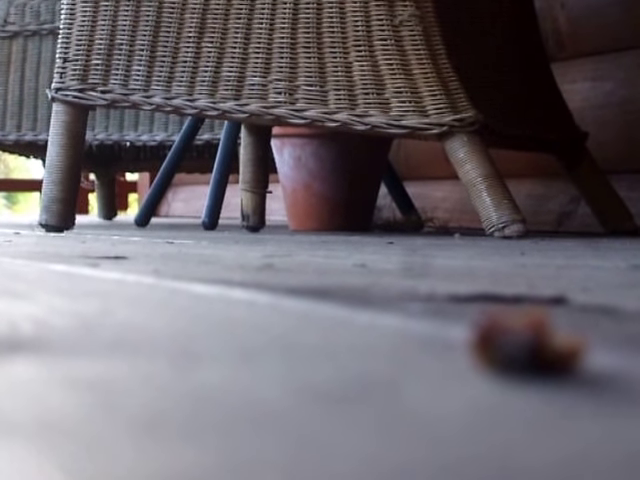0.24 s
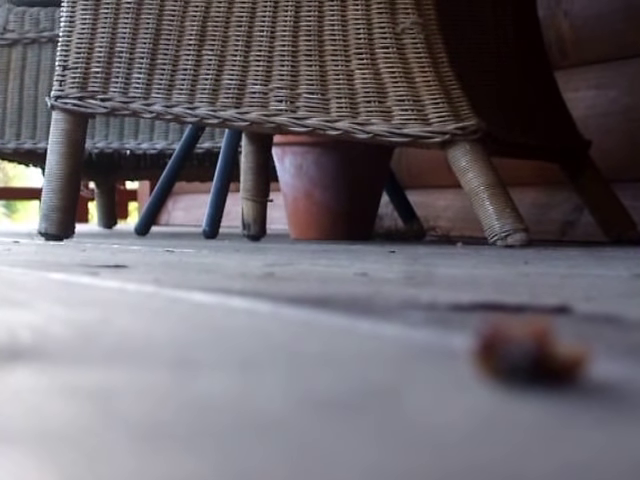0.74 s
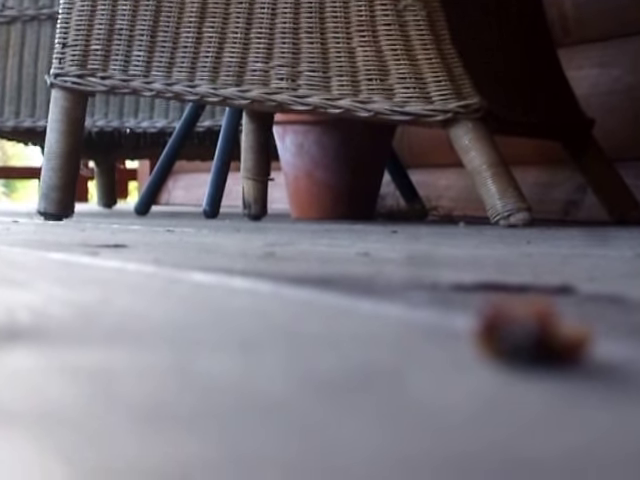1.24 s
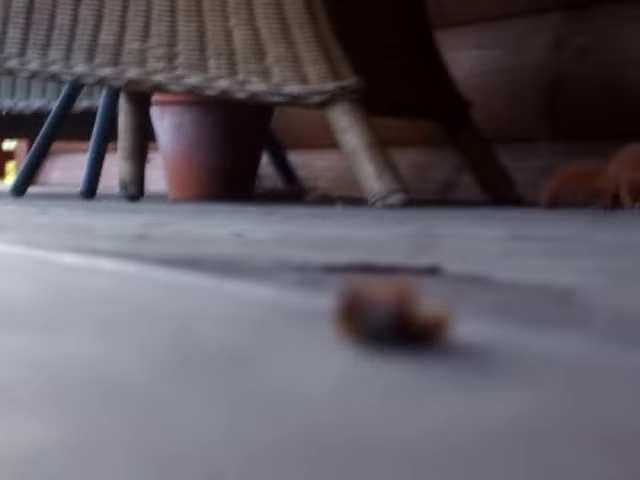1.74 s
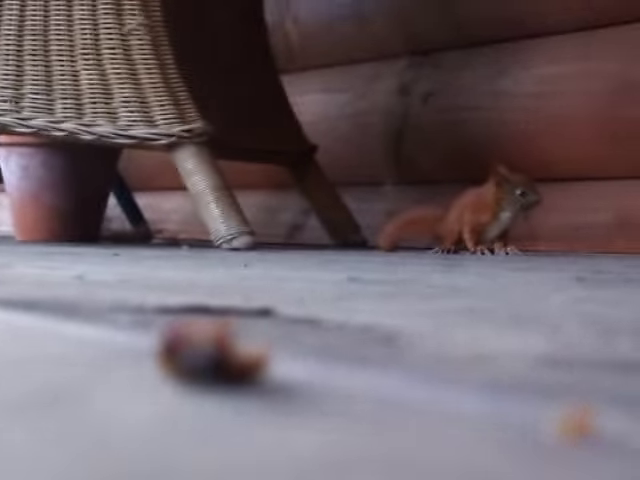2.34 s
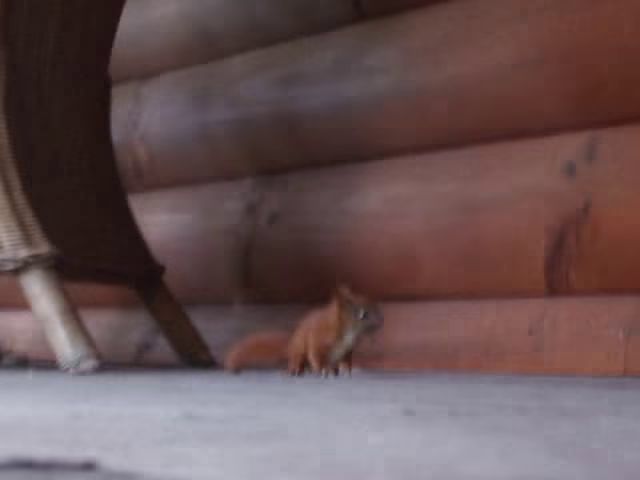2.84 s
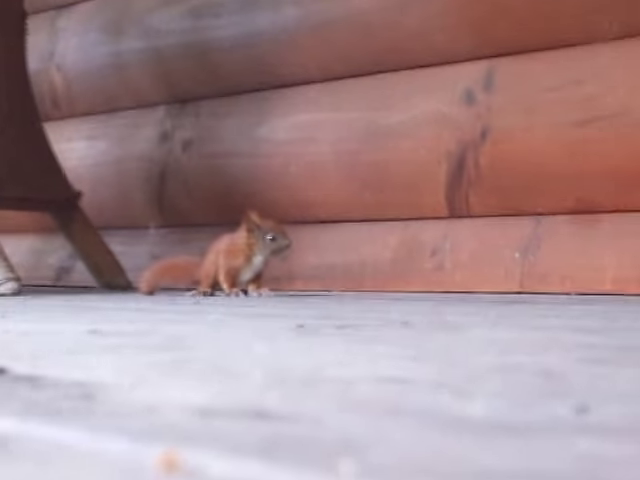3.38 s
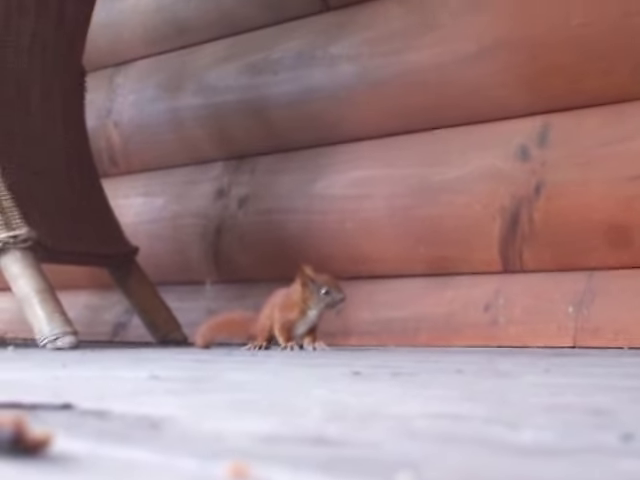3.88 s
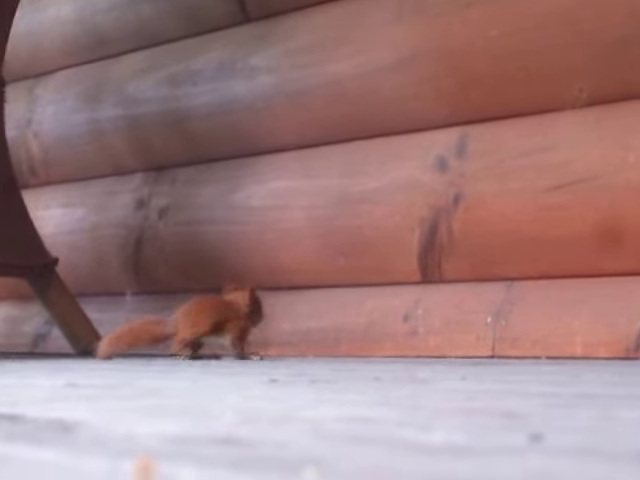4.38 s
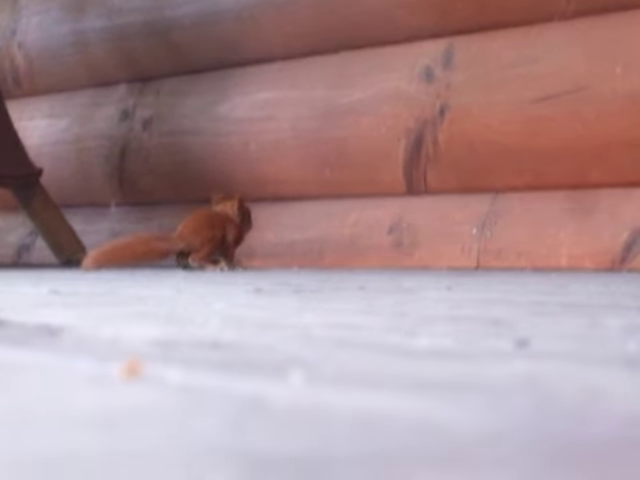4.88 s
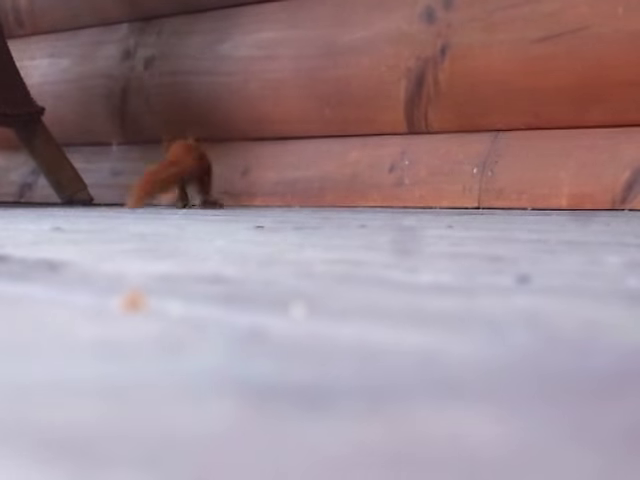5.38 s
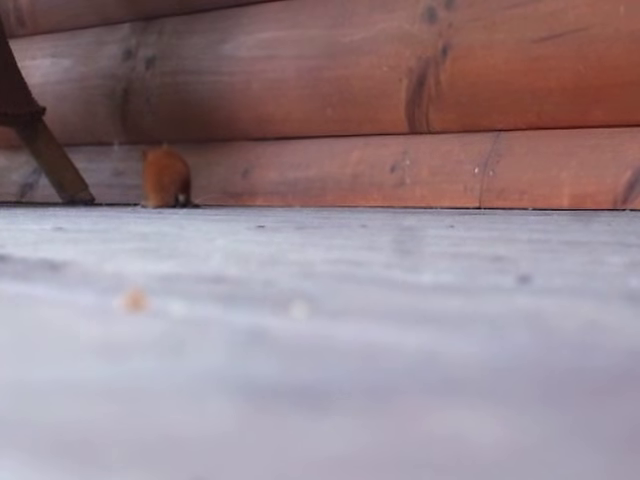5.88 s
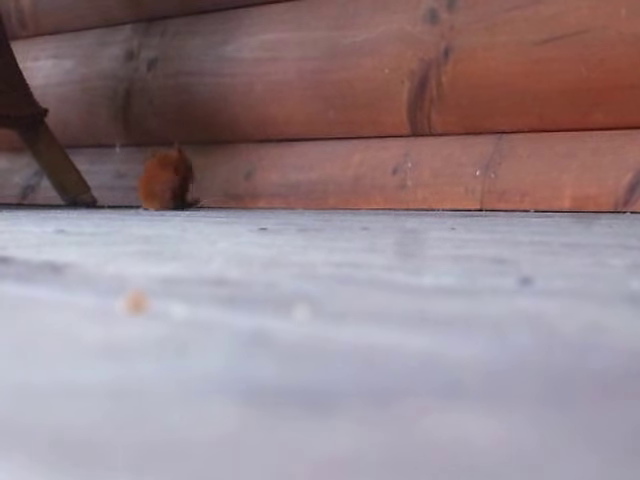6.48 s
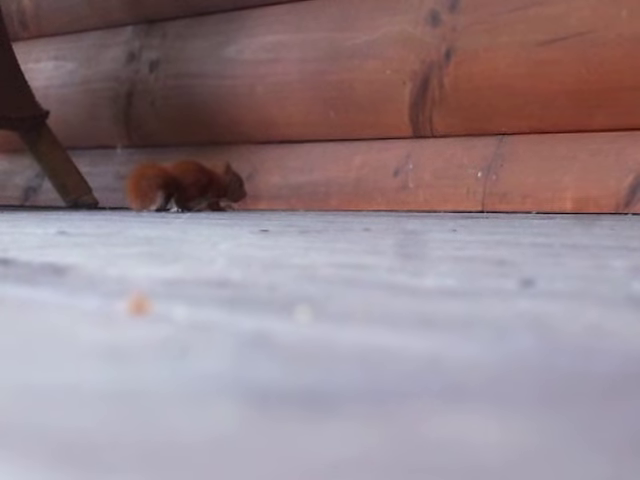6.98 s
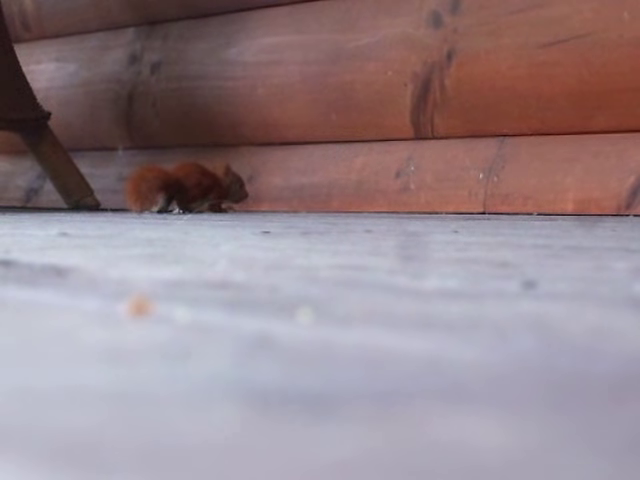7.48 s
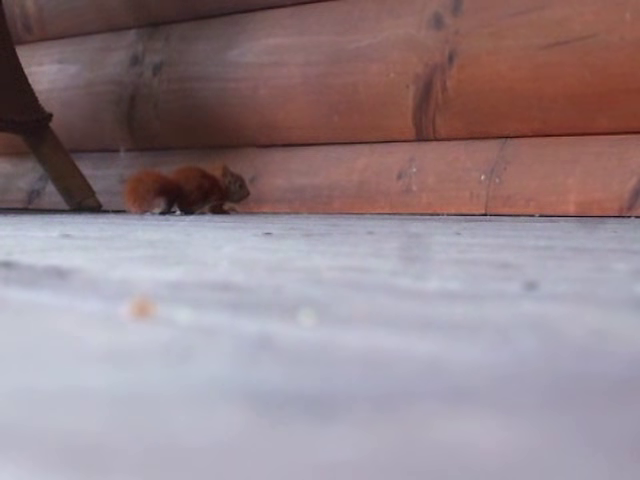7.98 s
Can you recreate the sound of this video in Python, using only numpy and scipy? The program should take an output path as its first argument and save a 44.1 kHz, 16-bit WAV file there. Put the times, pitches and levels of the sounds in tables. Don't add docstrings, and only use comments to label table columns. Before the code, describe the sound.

A small camera grates in jerks over gritty porch boards, gets knocked hard twice, then squirrel claws scratch and paws patter amid steady hiss.

```python
import sys
import numpy as np
from scipy import signal
from scipy.io import wavfile
from scipy.ndimage import uniform_filter1d

SR = 44100
rng = np.random.default_rng(int(sys.argv[2]) if len(sys.argv) > 2 else 0)


def boost_factor(decibels):
    exponent = np.asarray(decibels, float) / 20
    return 10 ** exponent


def transcribe(u):
    v = np.clip(np.atleast_2d(u).T, -1, 1)
    q = np.round(v * 32767).astype(np.int16)
    wavfile.write(sys.argv[1], SR, q)


N = 362943

# [start t/s, length/s, pressure level/dB, grit over it/dB, low ring f/Hz]
DRAG_JERKS = [(0.324, 0.27, -47, -5.5, 1074), (0.57, 0.053, -34, -2, 690), (0.588, 0.049, -37, 6.5, 690),
              (0.646, 0.072, -35, -5.5, 600), (0.696, 0.05, -38, -9.5, 680), (0.8, 0.034, -44, -8, 730),
              (0.811, 0.065, -36.5, -5, 690), (0.877, 0.077, -37, -7.5, 700), (0.925, 0.092, -40, -10, 690),
              (0.984, 0.14, -41, -10, 690), (1.091, 0.088, -41.5, -7, 724), (1.14, 0.045, -38, -2, 800),
              (1.159, 0.07, -32, -2, 780), (1.19, 0.054, -27.5, -6.5, 663), (1.216, 0.06, -36.5, -0.5, 696),
              (1.255, 0.059, -37, -3.5, 730), (1.286, 0.058, -36, 1, 800), (1.303, 0.09, -29.5, -5, 780),
              (1.366, 0.074, -33, -4, 686), (1.415, 0.093, -31, -4, 750), (1.475, 0.078, -33.5, -1.5, 980),
              (1.529, 0.044, -34, 3, 920)]
# [f/Hz, width/Hz, level/dB]
CASE_MODES = [(497, 142, 0), (694, 550, -7.5), (1120, 83, -1)]
# [f/Hz, width/Hz, level/dB]
DEEP_BOARD_MODES = [(60, 100, -16.5), (131, 21, -9), (197, 87, -5.5), (287, 32, -3)]
# [f/Hz, width/Hz, level/dB]
GRIT_MODES = [(1650, 1360, -9), (2430, 320, 3), (3450, 720, 0)]
# [f/Hz, width/Hz, level/dB]
DUST_MODES = [(4560, 390, 1.5), (5830, 640, -2.5), (6110, 410, 2.5), (7600, 570, -3.5)]
# [t/s, strength level/dB, contact/ms]
CASE_BLOWS = [(0.659, -31.5, 1.8), (1.548, -26.5, 3), (3.4336, -7, 0.49), (3.4348, -18, 0.065),
              (3.4375, -10, 0.38), (3.4389, -8, 0.92), (3.4424, -17, 0.87), (3.451, -33.5, 0.55),
              (3.7344, -16.5, 1.63), (3.738, -15, 2.4), (3.7416, -25.5, 1.36), (3.7462, -36, 0.81),
              (3.754, -42, 0.84)]
# [f/Hz, level/dB, t60/s]
KNOCK_MODES = [(133, -20.5, 0.38), (150, -25.5, 0.26), (522, -40, 0.2), (185, -22.5, 0.07), (262, -39, .12),
               (403, -31.5, 0.36), (476, -6.5, 0.032), (780, 2, 0.01), (695, -33, 0.15), (983, -24.5, 0.11),
               (1390, -13, 0.0036), (1760, -17, 0.0078), (2200, -27, 0.0083), (2580, -6.5, .012),
               (2940, -7.5, 0.0097), (3530, -3, 0.0072), (4850, -5.5, 0.0055), (5500, -11.5, 0.0057),
               (6100, -0.5, 0.0041)]
# [t/s, peak level/dB, loudest ring f/Hz, upper ring over it/dB]
CLAW_JABS = [
    (4.1786, -20.5, 2320, -11),
    (4.1808, -24.5, 2540, -12),
    (4.184, -25, 2380, -12),
    (4.1902, -31, 2330, -14),
]
# [t/s, peak level/dB, loudest ring f/Hz, upper ring over it/dB]
CLAW_SCRAPES = [(4.3693, -38, 2300, -22), (4.377, -39, 2200, -20), (4.567, -34.5, 2250, -20),
                (4.5844, -39, 2170, -12), (7.8385, -24.5, 2680, -10), (7.8428, -29, 2250, -9),
                (8.0245, -35, 2300, -16), (8.1745, -34, 2200, -20), (8.1795, -35, 2200, -20),
                (8.186, -34, 2300, -14), (8.1915, -34, 2700, -6)]
# [t/s, peak level/dB, loudest ring f/Hz, upper
# ring over it/dB]
CLAW_SLIPS_HIGH_BOARD = [(4.7488, -22, 2290, -21), (4.7445, -39, 2250, -20), (4.7585, -30.5, 2950, -16),
                         (4.7624, -25, 2270, -17), (4.772, -35, 2190, -18), (4.7864, -45, 2260, -10),
                         (5.8184, -30, 2960, -1), (5.8228, -22.5, 2950, -6.5), (5.831, -29.5, 2250, -4),
                         (5.844, -37, 2250, -9), (5.8594, -41, 3000, -14), (5.8764, -43, 2980, -20),
                         (5.851, -40, 3000, -8), (5.9844, -39, 2210, -2), (6.1838, -36.5, 2430, -1),
                         (6.1994, -42, 2880, -10), (7.8296, -27, 2820, -8), (7.8335, -27, 2200, -5),
                         (8.0154, -31, 2300, -16), (8.0205, -29, 2260, -17), (8.1965, -29.5, 2250, -12),
                         (8.031, -36, 2200, -18), (5.838, -37, 2250, -6)]
# [f/Hz, level/dB, t60/s]
PLANK_MODES = [(2170, -26, 0.012), (2250, -3, 0.023), (2520, -8, 0.017), (2700, -4, 0.015),
               (2950, -2.5, 0.013), (3210, -5, 0.012)]
# [f/Hz, level/dB, t60/s]
SPLINTER_MODES = [(3500, 2, .012), (4240, -15, 0.016)]
# [t/s, peak level/dB,
# board f/Hz, t60/s, overtone level/dB]
BOARD_THUMPS = [(3.745, -28, 256, 0.035, -11), (4.083, -39.5, 262, 0.044, -14),
                (4.182, -34.5, 950, 0.053, -6), (4.185, -33.5, 330, 0.047, -14),
                (4.221, -38.5, 594, 0.05, -16), (4.307, -29, 605, 0.024, -12), (4.567, -43, 790, 0.081, -13),
                (4.749, -38, 990, 0.05, -14), (4.764, -34, 964, 0.052, -14), (7.843, -33, 505, 0.04, -12),
                (6.181, -49, 560, 0.032, -18), (7.689, -45.5, 296, 0.11, -14), (7.84, -31, 304, 0.086, -5),
                (8.026, -37.5, 317, 0.075, 0), (8.199, -30, 330, 0.048, -12)]
# [start t/s, length/s, level/dB, ring f/Hz at start, ring f/Hz at end]
PAW_SHUFFLES = [
    (4.2, 0.078, -52, 720, 710),
    (4.36, 0.11, -52, 880, 810),
    (4.495, 0.072, -46, 720, 700),
    (4.56, 0.065, -42.5, 850, 810),
    (5.585, 0.08, -48.5, 656, 590),
    (6.355, 0.058, -50.5, 410, 385),
    (6.762, 0.035, -44.5, 1000, 1060),
    (7.04, 0.065, -54, 800, 780),
    (7.595, 0.087, -49.5, 1200, 1650),
    (7.62, 0.063, -45, 850, 1550),
]
# [t/s, peak level/dB, ring f/Hz, treble over it/dB]
DRY_TICKS = [(0.6108, -25, 2000, -8), (0.8876, -36, 2320, -11), (0.934, -39, 2250, -0.5),
             (1.1692, -34, 2340, -23), (1.3452, -26, 3160, -17), (1.465, -28, 3100, -2),
             (1.4802, -26, 3530, -3), (1.5448, -37, 2580, -8), (1.5534, -34, 2340, -8),
             (4.15, -31, 2410, -15), (4.309, -38, 2800, 0), (5.8245, -36.5, 2610, 3.5),
             (6.183, -38, 2820, -13), (6.747, -44, 2310, -13), (6.772, -39, 1500, -10),
             (7.0628, -37, 3700, -2), (8.086, -40, 1000, -8)]
# [loudest t/s, level/dB, rise/(dB/s), fall/(dB/s)]
RUSTLE_SWELLS = [
    (6.814, -41.5, 120, 92),
    (7.06, -42, 100, 115),
    (7.646, -47, 105, 51),
    (7.832, -41.5, 900, 190),
    (8.02, -46, 35, 16),
    (8.23, -44, 60, 60),
]
# [f/Hz, level/dB per Hz]
RUSTLE_SPECTRUM = [(88, -38), (150, -21), (361, 0), (403, -8), (450, -7), (677, -1.5), (844, -2.0),
                   (2000, -1), (6400, -4.5), (8320, -39), (14100, -120)][:-2]
# [start t/s, length/s, level/dB, swell start to end/dB, laziness 0-1 (1 = plain glide)]
WHISTLES = [
    (0.47, 0.1, -57, -5, 0.1),
    (2.04, 0.1, -69, 14, 0),
    (3.449, 0.113, -49.5, -7, 0),
    (5.412, 0.14, -55.5, 0, 0.94),
]
# [share of length, pitch f/Hz]
WHISTLE_PITCH = [(0, 3570), (0.25, 3830), (0.56, 4010), (0.78, 4480), (0.87, 4700), (1, 4760)]
# [f/Hz, level/dB per Hz]
HISS_SPECTRUM = [(12, -36), (20, -3), (27, -11.5), (145, -12.5), (252, -12.0), (278, -11.5), (484, -11.5),
                 (520, -9.5), (678, -11.5), (843, -8), (1370, -14.5), (1780, -13.5), (6400, -17),
                 (8320, -49), (14100, -120)][:-2]
# [f/Hz, level/dB]
CONVERTER_TONES = [(8269, -102), (9647, -107), (11025, -91.5), (12403, -104)]
# [f/Hz, level/dB per Hz]
CONVERTER_NOISE = [(8000, -40), (8600, -8), (11000, 0), (13000, -8), (13500, -40)]


def drag():
    dust_db, dust_per_grit, grit_hz = -1.5, 1.3, 2930
    treble = signal.butter(3, 4100, "high", fs=SR, output="sos")
    size = SR * 3 // 10
    out = np.zeros(N)
    for s, length_s, db, grit_db, low_hz in DRAG_JERKS:
        clumps = boost_factor(0.69 * evened(uniform_filter1d(rng.standard_normal(size), size=200)))
        coarse = clumps * grains(size, 1500, spread_db=0.5)
        fine = clumps * grains(size, 3500, spread_db=2.0)

        grip = resonate(resonate(coarse, low_hz, 280), low_hz, 260)
        low = body(coarse, CASE_MODES) + boost_factor(1.5) * grip
        low += boost_factor(0.16 * (db + 29)) * body(coarse, DEEP_BOARD_MODES)
        grit = body(fine, GRIT_MODES) + boost_factor(-8.5) * resonate(resonate(fine, grit_hz, 560), grit_hz, 560)
        dust = signal.sosfilt(treble, body(fine, DUST_MODES))

        rub = evened(low) + boost_factor(grit_db) * evened(grit)
        rub += boost_factor(dust_db + dust_per_grit * grit_db) * evened(dust)
        press = shape(length_s, attack_s=0.018, release_s=0.028, sag_db=-6)[1][:size]
        add(out, s, boost_factor(db) * press * rub[:len(press)])
    return out


def knocks():
    force = np.zeros(N)
    for s, db, contact_ms in CASE_BLOWS:
        push = np.sin(np.pi * np.clip(np.arange(200) / SR / (contact_ms / 1000), 0, 1))
        add(force, s, boost_factor(db) * push / push.sum())
    no_bass = signal.butter(6, 112, "high", fs=SR, output="sos")
    return signal.sosfilt(no_bass, signal.oaconvolve(force, ring(KNOCK_MODES))[:N])


def claws():
    out = np.zeros(N)
    t_ms = np.arange(2000) / SR * 1000
    lower_band = signal.butter(5, [1980, 3300], "band", fs=SR, output="sos")
    upper_band = signal.butter(4, [3300, 4700], "band", fs=SR, output="sos")
    manners = [(3300, 0.6, CLAW_JABS), (2900, 2.27, CLAW_SCRAPES), (4080, 2.08, CLAW_SLIPS_HIGH_BOARD)]
    for upper_hz, slip_ms, slips in manners:
        upper = ring(SPLINTER_MODES + [(upper_hz, 1, 0.022)])[:4000]
        stroke = t_ms * np.exp(-t_ms / slip_ms)
        for s, db, hz, upper_db in slips:
            spot = rng.uniform(1.0, 1.02, len(PLANK_MODES))
            plank = [(f * k, level_db, t60) for (f, level_db, t60), k in zip(PLANK_MODES, spot)]
            lower = ring(plank + [(hz, 4, 0.018)])[:4000]
            clicks = stroke * grains(len(t_ms), 7000, spread_db=3.5)
            board = signal.sosfilt(lower_band, signal.fftconvolve(clicks, lower))
            top = signal.sosfilt(upper_band, signal.fftconvolve(clicks, upper))
            slip = board / abs(board).max() + boost_factor(upper_db) * top / abs(top).max()
            add(out, s - 0.6 * slip_ms / 1000, boost_factor(db) * slip)
    return out


def paws():
    out = np.zeros(N)
    onset = np.minimum(np.arange(8000) / SR / 0.0024, 1)
    for s, db, hz, t60, overtone_db in BOARD_THUMPS:
        modes = [(hz, 0, t60), (hz * 2.0, overtone_db, 0.03), (hz * 1.316, overtone_db + 3.5, 0.03)]
        add(out, s, boost_factor(db) * ring(modes)[:8000] * onset)
    for s, length_s, db, start_hz, end_hz in PAW_SHUFFLES:
        along, press = shape(length_s, attack_s=0.017, release_s=0.028, sag_db=-3)
        size = len(along)
        hz = start_hz + (end_hz - start_hz) * along
        rub = resonate(resonate(grains(SR // 5, 1400, spread_db=2.0)[:size], hz, 480), hz, 480)
        hollow = resonate(grains(SR // 5, 800, spread_db=3.0)[:size], 260, 120)
        add(out, s, press * boost_factor(db) * (evened(rub) + boost_factor(-9.5) * evened(hollow)))
    return out


def ticks():
    out = np.zeros(N)
    for s, db, hz, treble_db in DRY_TICKS:
        low = [(hz, 0, 0.012), (1150, -9, 0.015)]
        treble = [(4800, treble_db, 0.006), (5500, treble_db, 0.008),
                  (6300, treble_db - 0.5, 0.006), (7400, treble_db + 9.5, 0.02)]
        tick = ring(low + treble)[:2000]
        add(out, s, boost_factor(db) * tick)
        add(out, s + 0.001692, -boost_factor(db - 5.0) * tick)
    return out


def rustle():
    t = np.arange(N) / SR
    power = np.zeros(N)
    for s, db, rise, fall in RUSTLE_SWELLS:
        power += boost_factor(db + 3.5 - np.maximum(rise * (s - t), fall * (t - s))) ** 2
    return np.sqrt(power) * noise(RUSTLE_SPECTRUM, patchy_db=-0.5)


def bird():
    out = np.zeros(N)
    for s, length_s, db, swell_db, lazy in WHISTLES:
        along, breath = shape(length_s, attack_s=0.0062, release_s=0.012, sag_db=swell_db)
        song_hz = np.interp(along, *np.transpose(WHISTLE_PITCH))
        glide_hz = np.interp(along, [0, 1], [3730, 4520])
        hz = uniform_filter1d((1 - lazy) * song_hz + lazy * glide_hz, size=200)
        air_db = 3.8 * evened(uniform_filter1d(rng.standard_normal(SR // 5), size=250))[:len(hz)]
        tone = np.sin(2 * np.pi * np.cumsum(hz) / SR)
        add(out, s, np.sqrt(2) * breath * boost_factor(db + air_db) * tone)
    return out + boost_factor(-14) * np.roll(out, 900)


def porch(x):
    t = np.arange(SR // 3) / SR
    tail = grains(len(t), 2000, spread_db=-1.0) * boost_factor(-60 * t / 0.31) * (t > 0.004)
    return signal.oaconvolve(x, tail / np.linalg.norm(tail))[:N]


def noise(spectrum, patchy_db):
    hz = np.fft.rfftfreq(1024, 1 / SR)
    f, level_db = np.transpose(spectrum)
    a, b, patches = rng.standard_normal((N // 256 + 5, 513, 3)).T
    patches = uniform_filter1d(patches, size=10, axis=0)
    patches = evened(uniform_filter1d(patches, size=10, axis=1))
    colour_db = np.interp(np.log(hz + 1), np.log(f + 1), level_db)
    z = (a + 1j * b) * boost_factor(colour_db[:, None] + patchy_db * patches)
    return evened(signal.istft(z, nperseg=1024, noverlap=768)[1][:N])


def grains(size, per_s, spread_db):
    draw, strength, sign = rng.random((size, 3)).T
    level = boost_factor(-spread_db * np.log(strength + 0.0093))
    return evened((draw < per_s / SR) * level * np.sign(sign - 0.5))


def ring(modes):
    t = np.arange(SR // 2) / SR
    return sum(boost_factor(db - 60 * t / t60) * np.sin(2 * np.pi * hz * t) for hz, db, t60 in modes)


def resonate(x, hz, width_hz):
    turn = np.exp(2j * np.pi * np.cumsum(hz * np.ones(len(x))) / SR)
    r = np.exp(-np.pi * width_hz / SR)
    return 2 * (turn * signal.lfilter([1 - r], [1, -r], x / turn)).real


def body(slips, modes):
    return sum(boost_factor(db) * resonate(slips, hz, width_hz) * (-1) ** k
               for k, (hz, width_hz, db) in enumerate(modes))


def shape(length_s, attack_s, release_s, sag_db):
    t = np.arange(0, length_s, 1 / SR)
    edges = np.clip(np.minimum(t / attack_s, (length_s - t) / release_s), 0, 1)
    return t / length_s, np.sin(np.pi / 2 * edges) ** 2 * boost_factor(sag_db * t / length_s)


def evened(x):
    return x / np.sqrt(np.mean(x ** 2) + 1e-20)


def add(mix, s, sound):
    part = mix[round(s * SR):][:len(sound)]
    part += sound[:len(part)]


def scene():
    near = drag() + knocks()
    animal = claws() + paws() + ticks()
    echoes = boost_factor(-10.0) * porch(animal) + boost_factor(-27) * porch(near)
    return (near + animal + echoes + rustle() + bird())[None]


def low_pass(x):
    return signal.sosfilt(signal.butter(12, 13000, fs=SR, output="sos"), x)


def record(dry):
    hiss = boost_factor(-44.5) * noise(HISS_SPECTRUM, patchy_db=0.75)
    no_rumble = signal.sosfilt(signal.butter(1, 25, "high", fs=SR, output="sos"), dry)
    edge = signal.firwin(111, 6662, window=("kaiser", 9), fs=SR)  # low-pass, Hz
    band = signal.oaconvolve(no_rumble + hiss, edge[None], "same")
    t = np.arange(N) / SR
    whine = sum(np.sqrt(2) * boost_factor(db) * np.sin(2 * np.pi * hz * t) for hz, db in CONVERTER_TONES)
    faint = boost_factor(-96) * noise(CONVERTER_NOISE, patchy_db=0)
    offset = -0.0034
    return low_pass(band + whine + faint + offset)


dry = scene()
out = record(dry)
transcribe(out)
```